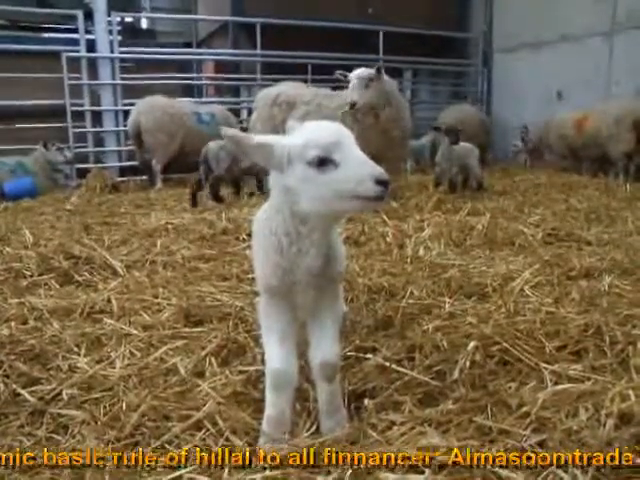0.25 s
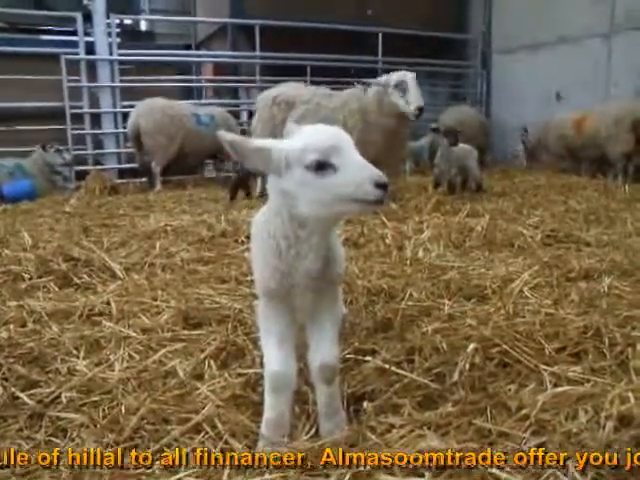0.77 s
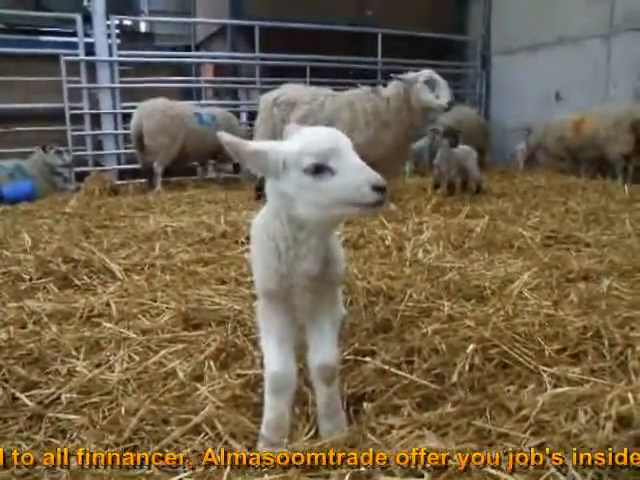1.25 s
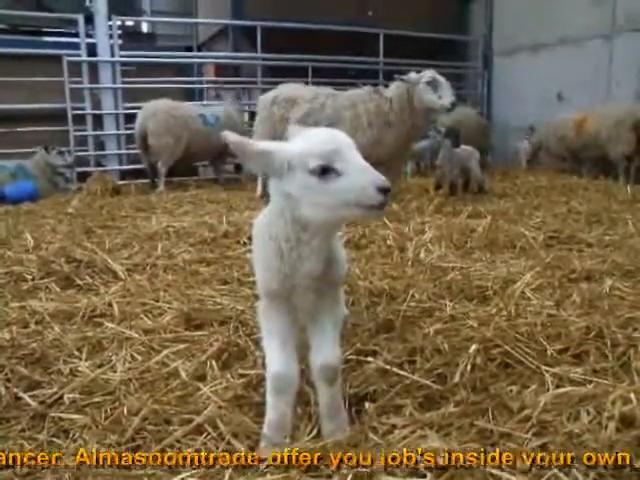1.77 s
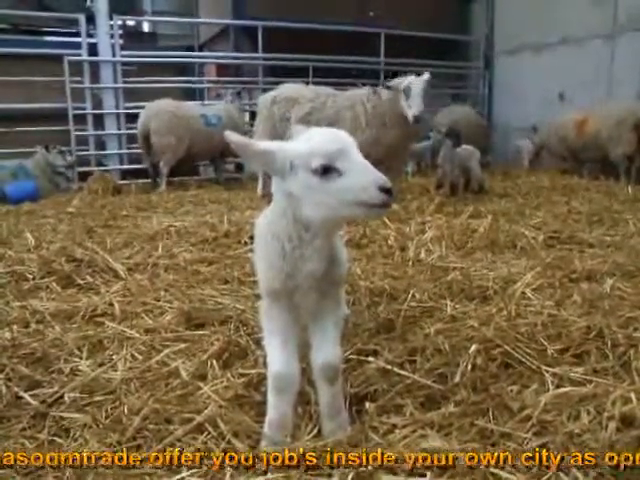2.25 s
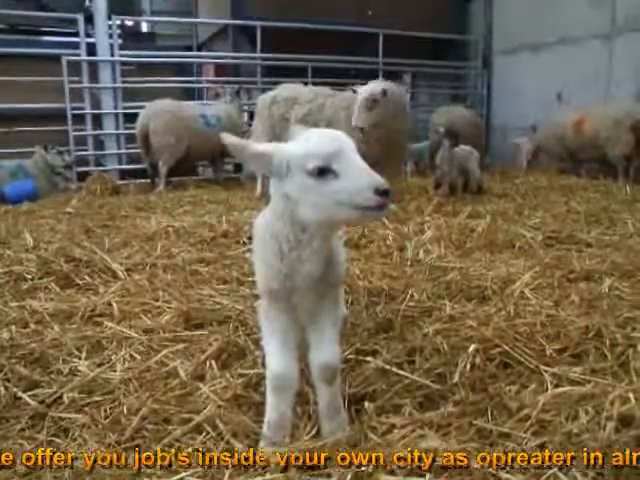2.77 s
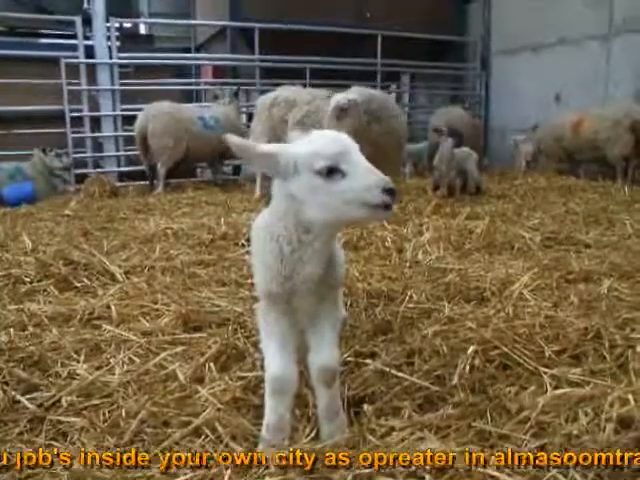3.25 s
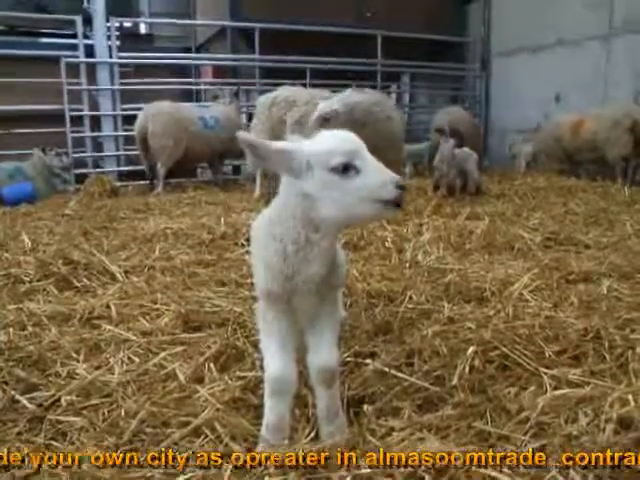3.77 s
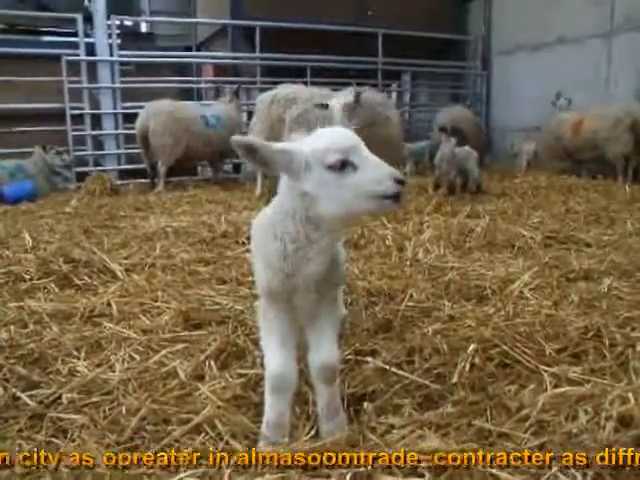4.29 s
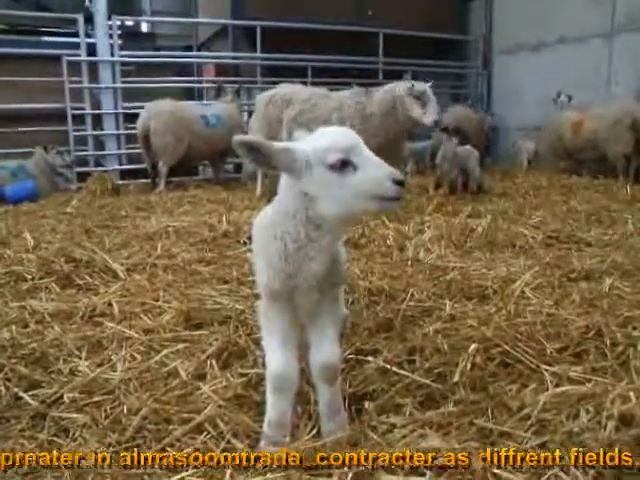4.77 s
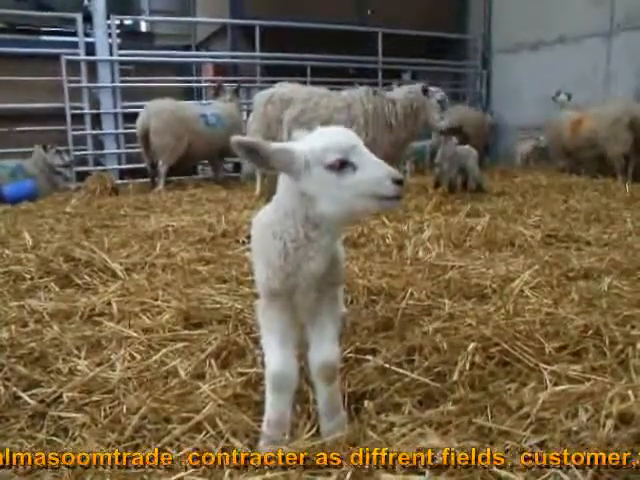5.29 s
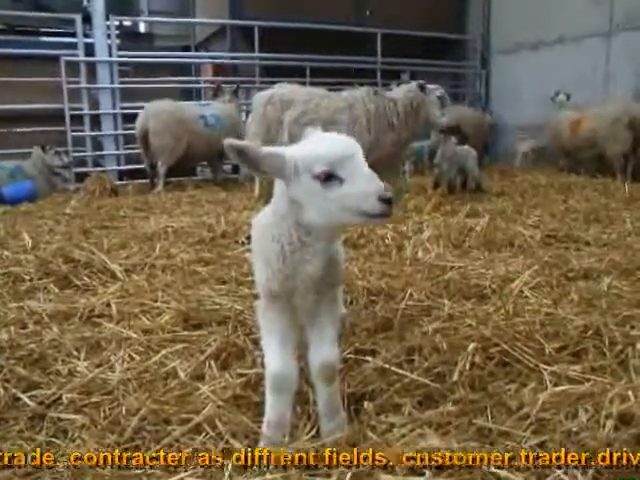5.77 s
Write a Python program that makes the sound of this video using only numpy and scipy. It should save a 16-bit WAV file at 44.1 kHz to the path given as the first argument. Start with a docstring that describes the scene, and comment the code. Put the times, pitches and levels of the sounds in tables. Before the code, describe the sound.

Lambs and ewes bleat in separate calls in an echoing barn, over a soft rustle of straw.

```python
"""Sheep in an echoing barn.

Two clear lamb bleats each sound over a low ewe, a hoarse bleat comes from the far end,
then two ewes rasp in turn. Vocal fold pulses and breath ring each throat; concrete echoes them.
Straw rustles throughout. A low-rate sample-and-hold mirrors the calls into a thin fizz."""
import sys
import numpy as np
from scipy import signal
from scipy.fft import rfft, irfft, next_fast_len
from scipy.io import wavfile
from scipy.ndimage import uniform_filter1d, map_coordinates

SR = 44100
rng = np.random.default_rng(int(sys.argv[2]) if len(sys.argv) > 2 else 0)


def wav_record(signal):
    """Record a signal, one row per channel, as 16-bit PCM in the file named by sys.argv[1]."""
    frames = np.transpose(np.atleast_2d(signal))
    bounded = np.clip(frames, -1, 1)
    # unit amplitude maps onto the largest positive 16-bit level
    quanta = np.round(bounded * 32767).astype(np.int16)
    wavfile.write(sys.argv[1], SR, quanta)


N = 265923
TIME_S = np.arange(N) / SR

# calls by name: start_s, attack_s, hold_s, release_s (negative cuts the hold short),
# first_hz, crest_hz, last_hz, rise_s, vowel_db, vowel_fade_db_per_s, rasp_db, rasp_fade_db_per_s
CALLS = { "falling lamb": (-0.0169, 0.0249, .27, 0.1945, 190, 190, 151, .02, -15.5, 3, -13.5, 12.5),
         "first ewe": (-0.05, 0.27, 0.16, 0.42, 129, 131, 105, 0.63, -18, 14, -25.5, 3),
         "far mutter": (1.15, 0.27, .2, .1, 126, 132, 125, 0.3, -42.5, 12, -42, 5),
         "long lamb": (1.558, 0.1452, 0.8, 0.22, 160, 229, 213, .34, -18, 3.5, -14, 10.5),
         "ewe underneath": (1.77, 0.1, 0.5, 0.26, 120, 135, 106, 0.2, -29.5, 3, -29, 0.5),
         "far bleat": (2.5, .5, 0.4, 0.57, 150, 162, 152, 0.35, -33.5, 11.5, -30.5, 2.5),
         "second far mutter": (4, 0.3, 1.1, -0.5, 125.5, 132, 126, 0.4, -44.5, 0, -42.5, -3),
         "loud ewe": (4.222, .23, 0.54, 0.0968, 107, 135, 134, .37, -12.5, 1, -18, 3.5),
         "last ewe": (5.0, 0.04, 0.47, 0.27, 136, 136, 104, 0.1, -21, 15, -28, 1), }
# throat resonances: centre_hz, width_hz, gain_db
FALLING_LAMB_THROAT = [(341, 79, 3), (593, 58, 10.5), (1060, 450, -7.5), (1498, 56, 4), (1790, 62, 3),
                       (2160, 113, -7), (2500, 120, -12), (3240, 200, -19)]
EWE_THROAT = [(564, 26, -26), (650, 45, 5), (1017, 320, -16.5), (1400, 240, -13), (1790, 83, -17),
              (1958, 310, -15.5), (2272, 320, -18.5)]
FAR_THROAT = [(456, 45, 3), (642, 120, 10), (1350, 520, 2.5), (1530, 220, 7.5), (1930, 200, 3),
              (2290, 610, -4)]
LONG_LAMB_THROAT = [(236, 32, -15.5), (442, 33, -11.5), (651, 71, 5), (1160, 120, -11), (1590, 110, -1.5),
                    (2076, 72, -1), (2275, 330, -7), (2756, 220, -9.5), (3260, 220, -16)]
UNDER_EWE_THROAT = [(395, 85, -31), (520, 200, -10.5), (1410, 120, -13.5), (2220, 1600, -24.5)]
LAST_EWE_THROAT = [(186, 70, -17.5), (345, 67, -12.5), (494, 50, -11), (613, 42, -2), (660, 73, -1.5),
                   (980, 430, -13.5), (1400, 180, -6), (1890, 330, -11), (2160, 470, -13),
                   (3400, 1200, -28)]
# voice roughness: jitter_ratio, quaver_ratio, turbulence_ratio
CLEAR = (.008, .007, .25)
GRAINY = (.013, .008, .35)
HOARSE = (.02, .012, .7)
CRACKED = (.03, .015, 1.2)
# chest partials: harmonic_number, level_db
HOLLOW_CHEST = [(1, 0), (2, -10), (3, 3)]
FULL_CHEST = [(1, 0), (2, -3), (3, -11)]
THIN_CHEST = [(1, 0), (2, -16), (3, -18)]
# noise spectra: freq_hz, density_db
MOUTH_SPECTRUM = [(1500, -7), (3800, -3), (5000, -1), (6500, -0.5), (8000, 2), (10000, -17)]
STRAW_SPECTRUM = [(800, -17), (2000, -9.5), (3500, -5), (5000, -7.5), (6500, 0), (8000, 3), (10000, -21)]
AIR_SPECTRUM = [(20, -3), (50, 2), (85, -2.5), (140, 3), (300, 0.5), (650, -4), (900, -1.5), (1500, -2),
                (2500, -7), (5000, -6)]
# swells of the straw and of the loud ewe's partial: peak_s, level_db, sigma_s
STRAW_SHUFFLES = [(1.05, -38.5, 0.83), (2.9, -42.5, 0.29), (4.25, -42, 0.33), (5.42, -39.5, 0.25),
                  (5.98, -38, 0.048)]
EWE_SURGES = [(4.502, -6.5, 0.009), (4.582, -8, 0.025), (4.754, -6.5, 0.015), (4.916, -9, 0.023)]


def from_db(db):
    """Decibels to gain."""
    return 10 ** (np.asarray(db) / 20)


def unit_rms(x):
    """Scale to unit power."""
    return x / np.sqrt(np.mean(x ** 2) + 1e-20)


def sine(phase_cycles):
    """Unit-power partial."""
    return np.sqrt(2) * np.sin(2 * np.pi * phase_cycles)


def drift(rate_hz):
    """Smooth random wander, unit spread."""
    pole = np.exp(-40 * np.pi * rate_hz / SR)
    white = rng.standard_normal(N // 20 + 2002)
    slow = signal.lfilter([1], [1, -2 * pole, pole * pole], white)[2000:]
    return np.interp(np.arange(N) / 20, np.arange(len(slow)), unit_rms(slow))


def butter(x, cutoff_hz, kind, order=2):
    """Butterworth low- or high-pass."""
    return signal.sosfilt(signal.butter(order, cutoff_hz, kind, fs=SR, output="sos"), x)


def noise(spectrum):
    """Coloured noise, unit power."""
    freq_hz, density_db = np.transpose(spectrum)
    size = next_fast_len(N, True)
    bins_hz = np.maximum(np.fft.rfftfreq(size, 1 / SR), 1)
    gain = from_db(np.interp(np.log(bins_hz), np.log(freq_hz), density_db))
    return unit_rms(irfft(gain * rfft(rng.standard_normal(size)))[:N])


def swells(rows):
    """Summed Gaussian gain swells."""
    return sum(from_db(level_db) * np.exp(-.5 * ((TIME_S - peak_s) / sigma_s) ** 2)
               for peak_s, level_db, sigma_s in rows)


def steady_level(x):
    """Hold the slow level near one; flutter and shallow dips remain."""
    size = int(.035 * SR)
    power = np.abs(uniform_filter1d(uniform_filter1d(x * x, size), size))
    slow_power = np.abs(uniform_filter1d(power, 8 * size))
    return x / np.sqrt(.75 * power + .25 * slow_power + 1e-12)


def call_pitch_hz(call):
    """Pitch scoops to its crest, then sags ever faster."""
    start_s, end_s = call[0], sum(call[:4])
    first_hz, crest_hz, last_hz, rise_s = call[4:8]
    rise = np.sin(np.pi / 2 * np.clip((TIME_S - start_s) / rise_s, 0, 1))
    sag = np.interp(TIME_S, [start_s + rise_s, end_s], [0, 1]) ** 1.5
    return first_hz + (crest_hz - first_hz) * rise + (last_hz - crest_hz) * sag


def effort(call, lead_s=0):
    """Push of a call, 0 to 1: attack, hold, release."""
    return np.interp(TIME_S + lead_s, np.cumsum(call[:4]), [0, 1, 1, 0])


def call_gains(call):
    """Vowel and rasp gains: both follow effort, with a steady dB slope after the attack."""
    vowel_db, vowel_fade_db_per_s, rasp_db, rasp_fade_db_per_s = call[8:]
    held_s = np.maximum(TIME_S - call[0] - call[1], 0)
    push = effort(call)
    return (push ** .78 * from_db(vowel_db - vowel_fade_db_per_s * held_s),
            push ** 1.15 * from_db(rasp_db - rasp_fade_db_per_s * held_s))


def fold_cycles(pitch_hz, jitter, quaver):
    """Vocal fold phase with slow quaver and fast jitter."""
    return np.cumsum(pitch_hz * (1 + quaver * drift(14) + jitter * drift(110))) / SR


def ring_throat(x, throat):
    """Parallel resonances, alternating in sign."""
    out = np.zeros(N)
    for k, (centre_hz, width_hz, gain_db) in enumerate(throat):
        radius = np.exp(-np.pi * width_hz / SR)
        feedback = [1, -2 * radius * np.cos(2 * np.pi * centre_hz / SR), radius ** 2]
        gain = (-1) ** k * from_db(gain_db) * (1 - radius ** 2) / 2
        out += gain * signal.lfilter([1, 0, -1], feedback, x)
    return out


def barn_echo(x, t60_s):
    """Dense echoes off concrete walls and roof, unit power gain."""
    delay_s = TIME_S[:SR]
    echoes = rng.standard_normal(SR) * from_db(-60 * delay_s / t60_s) * (delay_s > .006)
    return signal.fftconvolve(x, echoes / np.sqrt(np.sum(echoes ** 2)))[:N]


def bleat(call, throat, roughness, wet_db, vowel_share=1, split_hz=1010):
    """Fold closures and turbulent puffs ring the throat; the barn smears them."""
    jitter, quaver, turbulence = roughness
    phase = fold_cycles(call_pitch_hz(call), jitter, quaver)
    closures = np.diff(np.floor(phase), prepend=0) * from_db(3 * drift(45))
    puffs = butter(rng.standard_normal(N) * np.exp(-3 * (phase % 1)), 120, "high", order=4)
    # folds close less cleanly at both ends of a call
    ragged = 1 + np.interp(TIME_S, [call[0], sum(call[:4])], [-1, 1]) ** 2
    voice = ring_throat(unit_rms(closures) + turbulence * ragged * unit_rms(puffs), throat)
    voice += from_db(wet_db) * barn_echo(voice, t60_s=.61)
    vowel = steady_level(butter(voice, split_hz, "low", order=6))
    upper = butter(voice, split_hz, "high", order=6)
    rasp = steady_level(butter(upper, 2860, "low"))
    vowel_gain, rasp_gain = call_gains(call)
    return vowel_share * vowel_gain * vowel + rasp_gain * rasp


def falling_lamb():
    """A clear, high bleat sinking in pitch."""
    return bleat(CALLS["falling lamb"], FALLING_LAMB_THROAT, CLEAR, wet_db=-5.5)


def chest(call, partials, level_db, lead_s=.11, sag_db_per_hz=.47):
    """A ewe's clean low partials: hum before the mouth opens, weaken as pitch sags."""
    pitch_hz = call_pitch_hz(call)
    phase = fold_cycles(pitch_hz, jitter=.016, quaver=.012)
    tone = sum(from_db(db + 2.8 * drift(14)) * sine(harmonic * phase) for harmonic, db in partials)
    push = np.maximum(effort(call, lead_s), effort(call))
    sag_hz = np.maximum.accumulate(pitch_hz) - pitch_hz
    return tone * np.sqrt(push) * from_db(level_db - sag_db_per_hz * sag_hz)


def ewes():
    """Four low calls: hoarse bleat over clean chest tone."""
    first, under = CALLS["first ewe"], CALLS["ewe underneath"]
    loud, last = CALLS["loud ewe"], CALLS["last ewe"]
    return (bleat(first, EWE_THROAT, HOARSE, wet_db=2) + chest(first, HOLLOW_CHEST, level_db=-38)
            + bleat(under, UNDER_EWE_THROAT, GRAINY, wet_db=3) + chest(under, FULL_CHEST, level_db=-39.5)
            + surging_ewe(loud) + chest(loud, FULL_CHEST, level_db=-35.5)
            + bleat(last, LAST_EWE_THROAT, CRACKED, wet_db=4.5) + chest(last, THIN_CHEST, level_db=-34))


def mouth_hiss(re_rasp_db=-18.2):
    """Air through open mouths, following each call's rasp."""
    rasp_power = sum(call_gains(call)[1] ** 2 for call in CALLS.values())
    return from_db(re_rasp_db) * noise(MOUTH_SPECTRUM) * np.sqrt(rasp_power)


def straw(rest_db=-49, flicker_db=.9):
    """Straw hiss, swelling as the flock shuffles."""
    gain = np.hypot(from_db(rest_db), swells(STRAW_SHUFFLES))
    return noise(STRAW_SPECTRUM) * gain * from_db(flicker_db * drift(40))


def barn_air(level_db=-35.5):
    """Steady murmur of air."""
    return from_db(level_db) * noise(AIR_SPECTRUM)


def far_sheep():
    """Three calls from the back of the pen, mostly echo."""
    names = "far mutter", "far bleat", "second far mutter"
    return sum(bleat(CALLS[name], FAR_THROAT, CRACKED, wet_db=10) for name in names)


def trembling_lamb(peak_s=1.742, rate_hz=7.58, depth_db=5, decay_s=.5):
    """A long, rising bleat; its vowel is held back, then trembles less and less."""
    since_s = np.maximum(TIME_S - peak_s, -.5 / rate_hz)
    tremble_db = depth_db * np.exp(-since_s / decay_s) * np.cos(2 * np.pi * rate_hz * since_s)
    return bleat(CALLS["long lamb"], LONG_LAMB_THROAT, GRAINY, wet_db=-3, vowel_share=from_db(tremble_db))


def surging_ewe(call, clean_db=-6.5, rough_db=-2.5):
    """A near-pure partial rings in the main throat resonance; its surges displace the rough vowel."""
    surge = swells(EWE_SURGES)
    steady = from_db(clean_db) * call_gains(call)[0]
    partial = sine(fold_cycles(pitch_hz=661, jitter=.016, quaver=.008))
    rough_share = from_db(rough_db) * (1 - .5 * surge / surge.max())
    rough = bleat(call, EWE_THROAT, HOARSE, wet_db=3.5, vowel_share=rough_share)
    return np.hypot(surge, steady) * partial + rough


def scene():
    """Flock, lingering echo, straw and air; mono."""
    flock = falling_lamb() + trembling_lamb() + ewes() + far_sheep() + mouth_hiss()
    echo = from_db(-14) * barn_echo(flock, t60_s=1)
    return (flock + echo + straw() + barn_air())[None]


def record(dry, hold_hz=16000, cutoff_hz=15500, dc_offset=-.007):
    """Sample-and-hold mirrors the sound into the treble; a steep low-pass cuts the top."""
    narrow = butter(dry[0], hold_hz / 2, "low", order=16)
    held_index = np.floor(TIME_S * hold_hz) * SR / hold_hz
    held = np.clip(map_coordinates(narrow, [held_index], order=3, mode="nearest"), -1, 1)
    lowpass = signal.ellip(12, .2, 90, cutoff_hz, fs=SR, output="sos")
    return signal.sosfilt(lowpass, held + dc_offset)[None]


dry = scene()
out = record(dry)
wav_record(out)
```